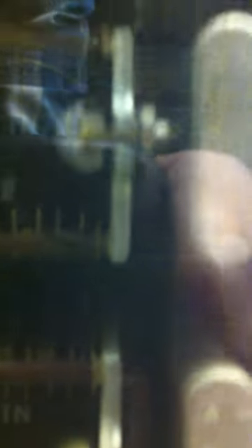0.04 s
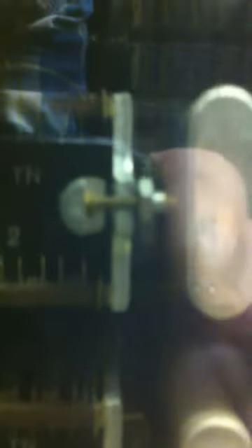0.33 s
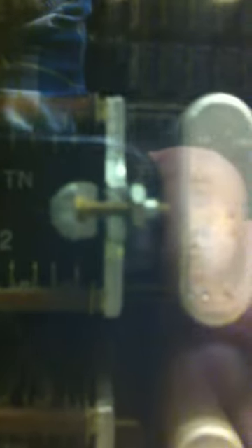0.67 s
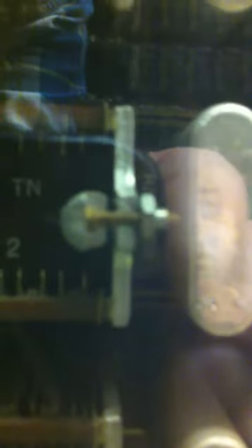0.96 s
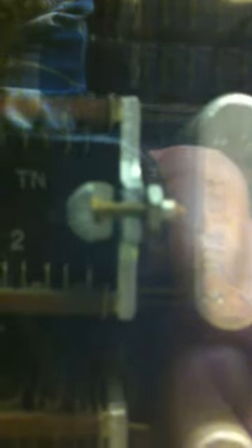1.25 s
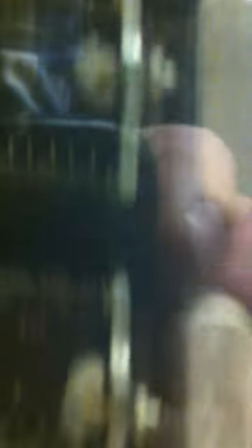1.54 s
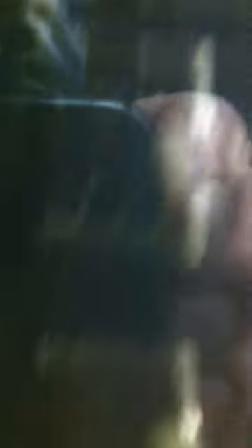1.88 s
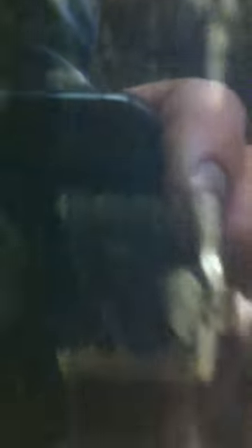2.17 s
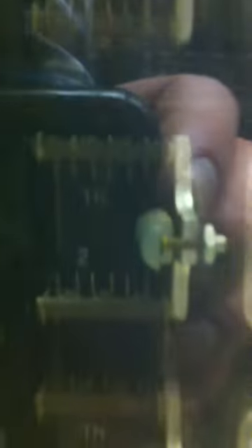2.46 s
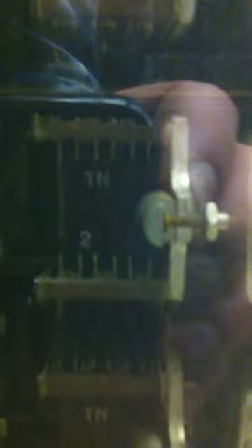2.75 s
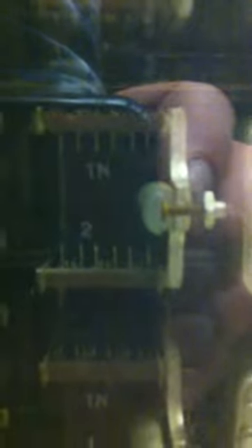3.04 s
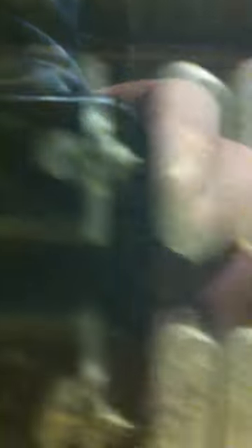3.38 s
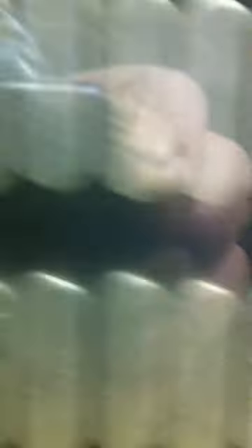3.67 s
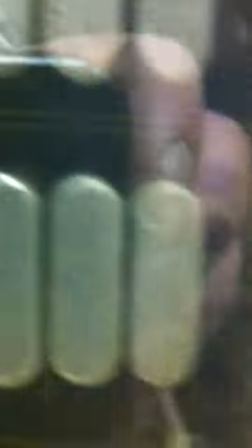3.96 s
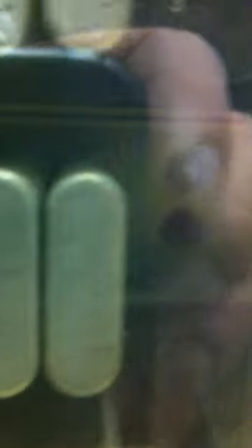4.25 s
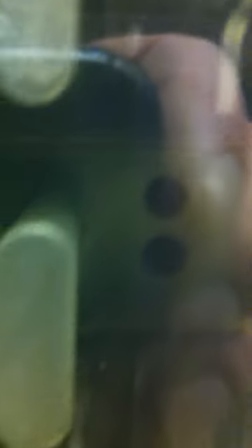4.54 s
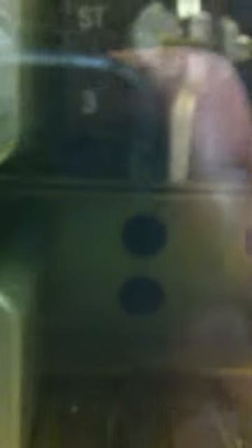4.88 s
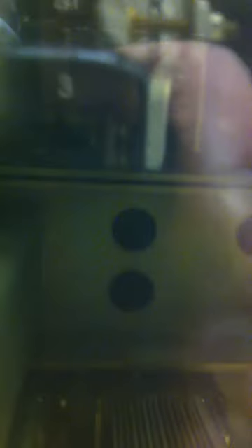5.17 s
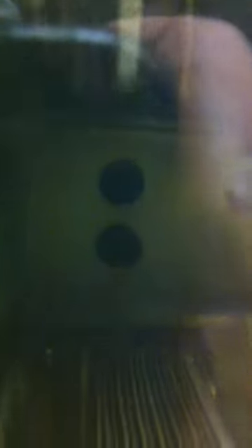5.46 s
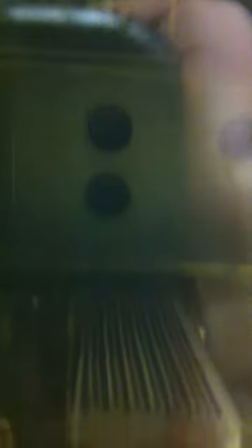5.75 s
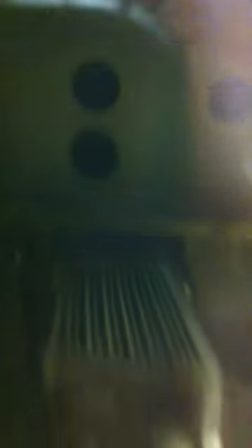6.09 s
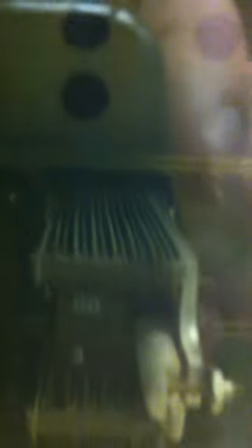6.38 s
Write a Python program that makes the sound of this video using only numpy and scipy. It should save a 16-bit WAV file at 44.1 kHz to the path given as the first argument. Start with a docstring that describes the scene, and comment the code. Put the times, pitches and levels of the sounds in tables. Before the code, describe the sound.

Telephone exchange relays clack steadily up close, with light snaps, a bright ping each second and a late selector rattle over low hum.

```python
"""Telephone exchange relay rack, close up.

Heavy relays clack in a round of four strokes a second, armatures closing stacks of bouncing contacts.
Light relays snap between them, singly and in even runs; a timing relay pings once a second.
Near the end a selector rattles over its contacts and strong clacks join in.
The steel rack rings after the blows, and machinery hums low in the room."""
import sys
import numpy as np
from scipy import signal
from scipy.fft import rfft, irfft, next_fast_len
from scipy.io import wavfile

SR = 44100
rng = np.random.default_rng(int(sys.argv[2]) if len(sys.argv) > 2 else 0)


def digitize_waveform(pressure):
    """Quantize a signal to 16-bit integers and store it at the path in sys.argv[1].

    Rows of a 2-D input are taken as channels; values are limited to [-1, 1].
    """
    field = np.atleast_2d(pressure).T
    bounded = np.clip(field, -1, 1)
    quanta = np.round(bounded * 32767).astype(np.int16)
    wavfile.write(sys.argv[1], SR, quanta)


N = 291942
RING_S = np.arange(SR * 3 // 4) / SR  # time axis of one blow


def amp(db):
    """Decibels to amplitude."""
    return 10 ** (np.asarray(db) / 20)


def unit_rms(x):
    """Scale to an RMS of one."""
    return x / np.sqrt(np.mean(x ** 2) + 1e-20)


def log_interp(points, hz):
    """Read (frequency [Hz], value) points on a log axis."""
    point_hz, values = np.transpose(points)
    return np.interp(np.log(hz + 1), np.log(point_hz), values)


def decay(t60_s):
    """Exponential decay, 60 dB down at t60_s."""
    return np.exp(-np.log(1000) * RING_S / np.maximum(t60_s, 1e-3))


def add(track, time_s, sound):
    """Mix a sound into a track."""
    span = track[max(round(time_s * SR), 0):][:len(sound)]
    span += sound[:len(span)]


def coloured(x, colour, peaks=()):
    """Causal filter: ringing peaks on a broad colour. Keeps the power of white noise."""
    size = 2 * next_fast_len(N // 2 + SR // 4)
    hz = np.fft.rfftfreq(size, 1 / SR)
    peaks_db = sum(db / (1 + 2 * ((hz - centre) / width) ** 2) for centre, width, db in peaks)
    gain = unit_rms(amp(log_interp(colour, hz) + peaks_db))
    cepstrum = irfft(np.log(gain))
    cepstrum[1:size // 2] *= 2  # fold to minimum phase
    cepstrum[size // 2 + 1:] = 0
    return irfft(rfft(x, size) * np.exp(rfft(cepstrum)), size)[:N]


# Room drone: (frequency [Hz], gain [dB])
ROOM_COLOUR = [(25, -31), (60, -18.5), (105, -6.5), (135, 5), (157, 14), (180, 13.5), (210, -0.5), (330, 1),
               (600, -1.5), (1500, -10), (2500, -17.5), (5000, -23), (15000, -35.5)]


def room_hum(drone_db, tone_db, tone_hz):
    """Running machinery fills the room with a low droning resonance and faint hiss."""
    drone = coloured(rng.standard_normal(N), ROOM_COLOUR)
    tone = np.sin(2 * np.pi * tone_hz * np.arange(N) / SR)
    return amp(drone_db) * drone + amp(tone_db) * tone


def crack(t60_s):
    """Noise burst of one contact closing."""
    return rng.standard_normal(len(RING_S)) * (1 - decay(0.0032)) * decay(t60_s)


# Steel rack decay: (frequency [Hz], t60 [s])
RACK_T60 = [(150, 1), (600, 0.99), (1500, 0.45), (3500, 0.25), (7000, 0.19), (15000, 0.12)]


def rack_rings(count, uneven_db):
    """Dense rack ringing, one row per blow. Each favours other resonances; treble dies first."""
    noise = rng.standard_normal((count, len(RING_S))).astype(np.float32)
    hz, time_s, spectra = signal.stft(noise, SR, nperseg=256)
    emphasis = unit_rms(amp(uneven_db * rng.standard_normal((count, len(hz), 1))))
    damping = np.exp(-np.log(1000) * time_s / log_interp(RACK_T60, hz)[:, None])
    _, rings = signal.istft(spectra * (emphasis * damping).astype(np.float32), SR, nperseg=256)
    return rings[:, :len(RING_S)]


def cabinet_boom(attack_s, t60_s):
    """Slow, hollow response of the cabinet to one blow."""
    return rng.standard_normal(len(RING_S)) * (1 - decay(attack_s)) * decay(t60_s)


# Even runs of snaps: (first [s], last [s], relative level [dB], kind)
SNAP_RUNS = [(0.0712, 0.5398, -30, "sharp"), (0.1478, 0.618, -31.5, "springy"), (5.238, 5.691, -35, "dull"),
             (5.0865, 5.5408, -24.5, "sharp")]


def stepping_runs(step_s):
    """Light relays step evenly, about step_s apart; returns (time, level, kind) rows."""
    snaps = []
    for first_s, last_s, db, kind in SNAP_RUNS:
        count = round((last_s - first_s) / step_s) + 1
        snaps += [(time_s, db, kind) for time_s in np.linspace(first_s, last_s, count)]
    return snaps


# Single snaps: (time [s], relative level [dB], kind)
SINGLE_SNAPS = [(0.0272, -28, "sharp"), (0.1875, -40, "dull"), (0.4251, -33.5, "dull"),
                (0.662, -41.5, "dull"), (0.735, -38.5, "firm"), (0.909, -40.5, "springy"),
                (1.804, -32.5, "firm"), (1.874, -31.5, "springy"), (1.886, -34.5, "dull"),
                (1.917, -33.5, "springy"), (2.0999, -30.5, "springy"), (2.143, -41, "dull"),
                (2.2204, -39.5, "twangy"), (2.3384, -32, "springy"), (2.381, -42.5, "dull"),
                (2.4567, -37, "twangy"), (2.495, -39.5, "firm"), (2.5689, -31.5, "springy"),
                (2.6102, -34.5, "dull"), (2.682, -39.5, "twangy"), (2.7205, -36.5, "firm"),
                (2.796, -31.5, "springy"), (2.97, -42, "springy"), (3.686, -33.5, "firm"),
                (3.764, -33.5, "springy"), (3.8054, -33.5, "springy"), (3.878, -38, "tinny"),
                (4.05, -34.5, "sharp"), (4.7936, -26.5, "dull"), (4.8674, -29.5, "dull"),
                (4.901, -29.5, "sharp"), (4.9733, -37.5, "tinny"), (5.011, -28.5, "sharp"),
                (5.199, -37.5, "tinny"), (5.429, -34.5, "tinny"), (5.5789, -33.5, "dull"),
                (5.649, -36.5, "tinny"), (5.764, -34, "firm"), (6.406, -27, "sharp"),
                (6.5793, -26.5, "firm")]
# Part offsets by kind: (leaf spring [dB], armature knock [dB], tine [dB])
LIGHT_PARTS_DB = {"sharp": (-13, -20.5, -23.5), "springy": (-4, -15.5, -22), "dull": (-9, -12.5, -21),
                  "firm": (-1.5, -7, -17.5), "twangy": (-2.5, -14, -7.5), "tinny": (-12, -12, -8.5)}
# Contact ring by kind: (t60 [s])
CONTACT_T60_S = {"sharp": 0.011, "springy": 0.014, "dull": 0.024, "firm": 0.025, "twangy": 0.019, "tinny":
                 0.029}
# Contact, spring, armature, tine and cabinet spectra: (frequency [Hz], gain [dB])
SNAP_COLOUR = [(3000, -23), (8000, -22), (10500, -5), (13000, 1), (15500, -0.5)]
SPRING_COLOUR = [(2500, -12.5), (5000, -5.5), (6500, 8), (7700, 2.5), (8400, 8), (9400, 8), (11500, -10),
                 (16000, -47)]
KNOCK_COLOUR = [(60, -43), (130, -9), (230, -2.5), (400, -14.5), (620, -5), (780, -9.5), (1000, -6.5),
                (1150, -2), (1420, 1), (1850, 1.5), (2400, -3.5), (3000, -2), (5000, -4.5), (12000, -25.5)]
TINE_COLOUR = [(300, -19), (1000, -12.5), (1600, -8), (2800, -4.5), (3800, -1.5), (5000, -6), (12000, -28)]
CABINET_COLOUR = [(60, -21), (115, -20.5), (155, 6), (185, 2), (215, -2.5), (300, -22.5), (600, -20)]
# Contact, spring and tine resonances: (centre [Hz], width [Hz], gain [dB])
SNAP_PEAKS = [(12300, 280, 5.5), (13000, 500, -3), (15000, 450, 1)]
SPRING_PEAKS = [(7100, 120, 3.4), (7760, 180, 11.7), (9200, 450, 2.4)]
TINE_PEAKS = [(1017, 130, 21.5), (2760, 220, 15.2)]


def light_relays(step_s):
    """Contacts crack and leaf springs quiver, then the rack rings."""
    snap, spring, knock, tine, boom = np.zeros((5, N))
    snaps = stepping_runs(step_s) + SINGLE_SNAPS
    rings = rack_rings(2 * len(snaps), uneven_db=3.5).reshape(len(snaps), 2, -1)
    for (time_s, snap_db, kind), ring_pair in zip(snaps, rings):
        spring_db, knock_db, tine_db = snap_db + np.array(LIGHT_PARTS_DB[kind])
        t60_s = CONTACT_T60_S[kind]
        contact, leaf = ring_pair * (1 - decay(0.01))
        strike = crack(t60_s * 0.57)
        contact_ring = contact * (decay(t60_s) + amp(-6.5) * decay(0.41))
        leaf_ring = leaf * (decay(t60_s * 2.3) + amp(-5.5) * decay(0.63))
        add(snap, time_s, amp(snap_db + 7) * (1.6 * strike + contact_ring))
        add(spring, time_s, amp(spring_db + 5) * (0.99 * strike + leaf_ring))
        add(knock, time_s, amp(knock_db + 2) * contact * (decay(0.13) + amp(-1.5) * decay(0.92)))
        add(tine, time_s, amp(tine_db + 6) * crack(0.14))
        add(boom, time_s, amp(snap_db - 6.5) * cabinet_boom(attack_s=0.11, t60_s=0.27))
    treble = coloured(snap, SNAP_COLOUR, SNAP_PEAKS) + coloured(spring, SPRING_COLOUR, SPRING_PEAKS)
    middle = coloured(knock, KNOCK_COLOUR) + coloured(tine, TINE_COLOUR, TINE_PEAKS)
    return treble + middle + coloured(boom, CABINET_COLOUR)


def contact_stack(span_s, t60_s, count):
    """Stacked contacts close in quick, uneven succession."""
    stack = np.zeros(len(RING_S))
    times_s = (np.arange(count) + rng.random(count)) / count * span_s
    gains = amp(rng.normal(0, 1.8, count))
    for time_s, gain in zip(times_s, gains):
        add(stack, time_s, gain * crack(t60_s))
    return stack


# Clacks, mostly in rounds of soft, full, soft, ringing: (time [s], relative level [dB], stroke)
HEAVY_CLACKS = [(0.034, -36.5, "soft"), (0.25, -29.5, "full"), (0.5, -36.5, "soft"),
                (0.744, -38.5, "ringing"), (1.01, -36.5, "soft"), (1.229, -29.5, "full"),
                (1.483, -37.5, "soft"), (1.731, -38.5, "ringing"), (1.985, -42.5, "soft"),
                (2.011, -36, "soft"), (2.232, -30, "full"), (2.497, -38.5, "soft"),
                (2.728, -38.5, "ringing"), (2.911, -39, "ringing"), (2.995, -37.5, "soft"),
                (3.223, -31.5, "full"), (3.492, -38, "soft"), (3.688, -42, "ringing"), (3.739, -35, "hard"),
                (3.993, -36, "soft"), (4.22, -30.5, "full"), (4.505, -38, "soft"), (4.751, -38, "ringing"),
                (4.838, -39, "bright"), (5.028, -36.5, "soft"), (5.239, -30.5, "full"),
                (5.513, -38, "soft"), (5.757, -40.5, "bright"), (5.846, -38.5, "ringing"),
                (5.878, -42, "bright"), (5.928, -26, "hard"), (6.031, -38.5, "soft"),
                (6.249, -30.5, "full"), (6.35, -39.5, "soft"), (6.51, -38, "soft"), (6.578, -23.5, "hard")]
# Part offsets by stroke: (contact snap [dB], armature knock [dB], yoke [dB], frame [dB])
HEAVY_PARTS_DB = {"full": (-1.5, -6, -8, -11.5), "soft": (-4, -4.5, -7.5, -12), "ringing": (1, -7, 0, -19),
                  "bright": (7.5, -12, -0.5, -20), "hard": (2.5, -8, -15, -33)}
# Contact bounce by stroke: (nominal duration [s])
BOUNCE_S = {"full": 0.024, "soft": 0.018, "ringing": 0.01, "bright": 0.018, "hard": 0.02}
# Steel frame modes: (frequency [Hz], relative level [dB], t60 [s])
FRAME_MODES = [(590.4, 4.5, 0.37), (608, 2.5, 0.26), (648.5, -4.5, 0.53), (942, -15.5, 0.73),
               (1360, -8, 0.18), (1785, -9.5, 0.56)]
# Frame ring over time: (time [s], gain [dB])
FRAME_GAIN = [(0.25, 3.5), (1.23, -0.5), (3.22, 4), (4.22, 0.5), (5.24, -1.5)]
# Contact stack and yoke spectra: (frequency [Hz], gain [dB])
CLATTER_COLOUR = [(800, -26), (2200, -5), (3200, -2.5), (3900, -4.5), (4800, 2.5), (6200, 1), (7000, -4),
                  (8500, 3), (10500, 2.5), (12500, -1), (15500, -13.5)]
YOKE_COLOUR = [(600, -28), (1500, -5.5), (1800, -4), (2300, -1), (2700, -9), (6000, -41)]
# Contact stack, armature and yoke resonances: (centre [Hz], width [Hz], gain [dB])
CLATTER_PEAKS = [(2870, 63, 3.9), (4290, 114, 6.6), (5830, 470, 2.5), (6930, 67, 7.6), (7320, 240, 8),
                 (8130, 50, 3.7), (8510, 340, 2.85), (9840, 50, 2.8)]
KNOCK_PEAKS = [(982, 64, 5), (1295, 14, 3.7), (1431, 32, 6.7), (1580, 26, 1.9), (1783, 39, 4.8),
               (2790, 50, 1.4)]
YOKE_PEAKS = [(1795, 48, 12.6), (2020, 160, 11), (2250, 53, 8.8), (4480, 200, 23), (5100, 150, 25)]


def heavy_relays(lead_s):
    """The armature closes bouncing contacts, seats on the core and sets yoke and frame ringing."""
    clatter, snap, knock, yoke, frame, boom = np.zeros((6, N))
    mode_hz, mode_db, mode_t60_s = np.transpose(FRAME_MODES)[:, :, None]
    modes = amp(mode_db) * decay(mode_t60_s) * np.sin(2 * np.pi * mode_hz * RING_S)
    rings = rack_rings(2 * len(HEAVY_CLACKS), uneven_db=2.5).reshape(len(HEAVY_CLACKS), 2, -1)
    for (time_s, clatter_db, stroke), ring_pair in zip(HEAVY_CLACKS, rings):
        snap_db, knock_db, yoke_db, frame_db = clatter_db + np.array(HEAVY_PARTS_DB[stroke])
        frame_db += np.interp(time_s, *np.transpose(FRAME_GAIN))
        bounce_s = BOUNCE_S[stroke]
        swell = np.minimum(RING_S / bounce_s, 1) ** 0.62  # each closing contact feeds the ring
        blows = amp(-6) * contact_stack(bounce_s * 1.2, t60_s=0.0092, count=6)
        add(blows, bounce_s * 1.15, amp(-9.5) * crack(0.095))  # armature seats
        body, edge = ring_pair * swell + blows
        frame_ring = rng.uniform(0.4, 1, len(FRAME_MODES)) @ modes
        contact_s = time_s - lead_s
        add(clatter, contact_s, amp(clatter_db + 8) * body)
        add(snap, contact_s, amp(snap_db + 10) * edge)
        add(knock, contact_s, amp(knock_db + 7.5) * body)
        add(yoke, contact_s, amp(yoke_db + 2) * edge * decay(0.75))
        add(frame, time_s, amp(frame_db + 6.5) * frame_ring * (1 - decay(0.077)))
        add(boom, time_s, amp(knock_db - 5) * cabinet_boom(attack_s=0.24, t60_s=0.53))
    treble = coloured(clatter, CLATTER_COLOUR, CLATTER_PEAKS) + coloured(snap, SNAP_COLOUR)
    middle = coloured(knock, KNOCK_COLOUR, KNOCK_PEAKS) + coloured(yoke, YOKE_COLOUR, YOKE_PEAKS)
    return treble + middle + frame + coloured(boom, CABINET_COLOUR)


# Pings: (time [s], relative level [dB])
TIMER_PINGS = [(0.8379, -14.5), (1.8369, -15.5), (2.824, -17), (3.8365, -17), (4.8524, -17.5),
               (5.8543, -18.5)]
# Ping spectrum: (frequency [Hz], gain [dB])
TIMER_COLOUR = [(100, -30.5), (600, -1.5), (900, -8.5), (1400, 3), (1800, 4), (2400, -2), (3450, -21),
                (4400, 0), (5800, -5), (8000, -1.5), (9000, 1), (10400, -6.5), (12000, -0.5), (15500, 2)]
# Ping resonances: (centre [Hz], width [Hz], gain [dB])
TIMER_PEAKS = [(4750, 590, 4.5), (4950, 340, 4.5), (5150, 110, 2.8), (6660, 160, 6.6), (9720, 230, 12),
               (11240, 250, 9.9), (12600, 300, 3)]


def timing_relay(travel_s):
    """Spring chatter grows while the armature travels; it strikes with a short, bright ping."""
    blows, echo = np.zeros((2, N))
    for (time_s, db), ring in zip(TIMER_PINGS, rack_rings(len(TIMER_PINGS), uneven_db=3)):
        chatter = contact_stack(travel_s, t60_s=0.046, count=5) * np.minimum(RING_S / travel_s, 1)
        strike = crack(0.021) + amp(-8) * crack(0.075)
        add(blows, time_s - travel_s, amp(db - 9.5) * chatter)
        add(blows, time_s, amp(db - 0.5) * strike)
        add(echo, time_s, amp(db - 14.5) * ring * (1 - decay(0.02)))
    rack = coloured(echo, CLATTER_COLOUR) + amp(-6) * coloured(echo, KNOCK_COLOUR, KNOCK_PEAKS)
    return coloured(blows, TIMER_COLOUR, TIMER_PEAKS) + rack


# Selector envelope: (time [s], rattle gain [dB], wiper scrape gain [dB])
SELECTOR_GAINS = [(5.87, -48, -35), (5.922, -46, -22), (5.984, -51, -37.5), (6.038, -36.5, -28),
                  (6.202, -43, -44.5), (6.356, -39, -36.5), (6.494, -46, -42.5), (6.62, -45, -45)]
# Wiper scrape spectrum: (frequency [Hz], gain [dB])
WIPER_COLOUR = [(100, -25), (300, -5), (800, -10.5), (2500, 1.5), (4000, -2.5), (9000, 2.5), (15500, 0)]


def selector(step_hz, jitter_s):
    """A selector farther along the rack rattles over its contacts, blurred by the ringing steel."""
    times_s, rattle_db, scrape_db = np.transpose(SELECTOR_GAINS)
    steps_s = np.arange(times_s[0], times_s[-1], 1 / step_hz)
    steps_s += rng.normal(0, jitter_s, len(steps_s))
    rattle, scrape = np.zeros((2, N))
    for time_s, ring in zip(steps_s, rack_rings(len(steps_s), uneven_db=1)):
        blow = ring * (1 - decay(0.039)) * amp(rng.normal(0, 2.6))
        add(rattle, time_s, amp(np.interp(time_s, times_s, rattle_db) - 2.5) * blow)
        add(scrape, time_s, amp(np.interp(time_s, times_s, scrape_db) - 1) * blow)
    boom = amp(-7.5) * coloured(rattle, CABINET_COLOUR)
    return coloured(rattle, KNOCK_COLOUR, KNOCK_PEAKS) + boom + coloured(scrape, WIPER_COLOUR)


def scene():
    """Relays, selector and room hum, the same on both channels."""
    mono = light_relays(step_s=0.23) + heavy_relays(lead_s=0.003) + timing_relay(travel_s=0.014)
    mono += selector(step_hz=59.67, jitter_s=0.0022)
    mono += room_hum(drone_db=-47.5, tone_db=-56, tone_hz=158.8)
    return np.array([mono, mono])


def record(dry):
    """Steep low-pass band limit."""
    cutoff_hz, transition_hz = 15850, 400
    size = next_fast_len(N + SR // 2)
    hz = np.fft.rfftfreq(size, 1 / SR)
    passband = np.clip((cutoff_hz - hz) / transition_hz + 0.5, 0, 1)
    return irfft(rfft(dry, size) * passband ** 2, size)[:, :N]


dry = scene()
out = record(dry)
digitize_waveform(out)
```